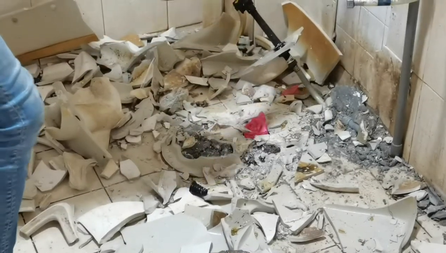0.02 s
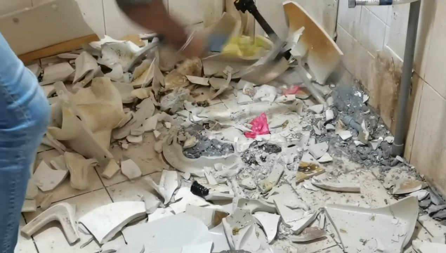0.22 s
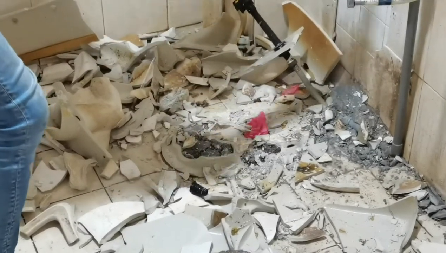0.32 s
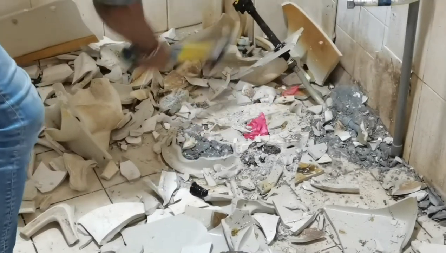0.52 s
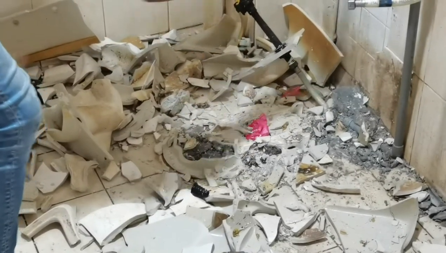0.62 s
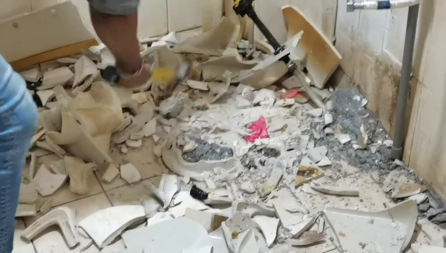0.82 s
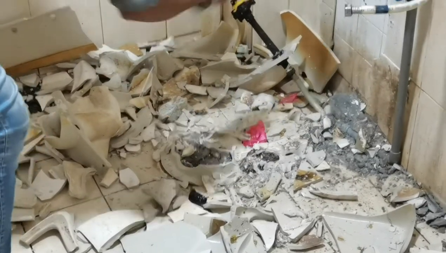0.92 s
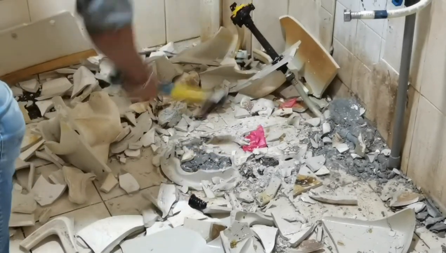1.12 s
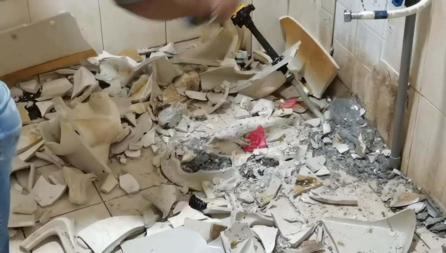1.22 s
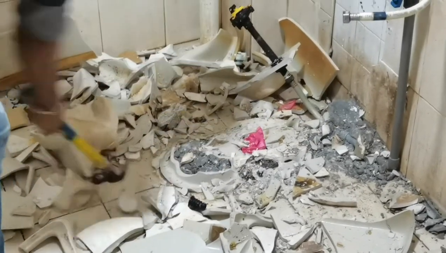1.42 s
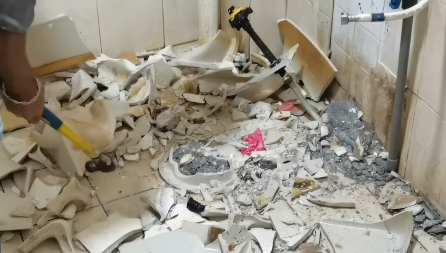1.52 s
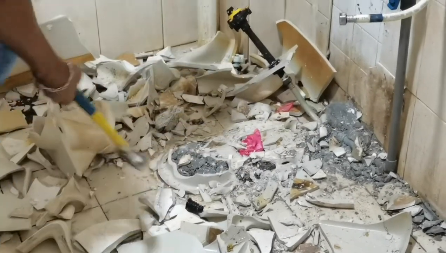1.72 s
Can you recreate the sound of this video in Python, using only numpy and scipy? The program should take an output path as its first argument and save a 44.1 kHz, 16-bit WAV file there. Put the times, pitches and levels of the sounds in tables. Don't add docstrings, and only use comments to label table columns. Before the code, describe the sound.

Hammer blows smash ceramic in a small tiled bathroom, the tail of an earlier blow still ringing at the start. Sharp cracks with brief steel ring and floor thud fall at 0.2 (hardest), 0.5, 0.8 and 1.13 seconds, then a weak tap at 1.44 with a crunchy scatter. Bright shards crumble and clink between, thinning after 1.6 into short reverberation, faint hum and soft handling bumps.

```python
import sys
import numpy as np
from scipy import signal
from scipy.fft import rfft, irfft, next_fast_len
from scipy.io import wavfile
from scipy.ndimage import uniform_filter1d

SR = 44100
rng = np.random.default_rng(int(sys.argv[2]) if len(sys.argv) > 2 else 0)


def makeup_ratio(level_db):
    decades = np.asarray(level_db, float) / 20
    return 10 ** decades


def file_out(sig):
    cols = np.atleast_2d(sig).T
    lim = np.clip(cols, -1, 1)
    pcm = np.round(lim * 32767).astype(np.int16)
    wavfile.write(sys.argv[1], SR, pcm)


N = 79380
PRE = SR // 5
TOP_HZ = 15300

# t/s, crack level/dB, low head ring level/dB, high head ring level/dB, thud level/dB
BLOW_TABLE = [
    (.2003, -3.5, -10, -12, -16),
    (.498, -8.5, -9, -17, -20),
    (.807, -11.5, -13, -19.5, -22),
    (1.1302, -7.5, -13, -15, -20),
    (1.439, -17, -26, -28, -30),
]


def shape(x, curve):
    n = next_fast_len(x.shape[-1] + 4096)
    hz, db = np.array(curve, float).T
    f = np.maximum(np.arange(n // 2 + 1) * SR / n, 1)
    gain = makeup_ratio(np.interp(np.log(f), np.log(hz), db))
    return irfft(rfft(x, n) * gain, n)[..., :x.shape[-1]]


def unit(x):
    return x / np.abs(x).max()


def ring(modes, rise_s):
    t = np.arange(SR // 3) / SR
    hz, db, t60 = np.array(modes, float).T[:, :, None]
    tones = makeup_ratio(db) * np.sin(2 * np.pi * np.minimum(hz, .45 * SR) * t)
    fade = 1000 ** (-t / t60)
    return (tones * fade).sum(0) * (1 - np.exp(-t / rise_s))


def add(track, sound, s):
    i = int(round(s * SR)) + PRE
    track[i:i + len(sound)] += sound[:max(len(track) - i, 0)]


def air():
    # f/Hz, level/dB
    colour = [(18, -27), (30, -3), (105, 3.5), (485, -19), (7830, -61), (9150, -49.5), (10400, -21),
              (15000, -54.5)]
    x = shape(rng.standard_normal((2, N)), colour)
    steps = np.repeat(rng.standard_normal(N // 2000 + 1), 2000)
    swell = uniform_filter1d(steps, 2000)[:N]
    return makeup_ratio(-60 + 2.4 * swell) * x / x.std()


def hand_bumps():
    # t/s, level/dB, f/Hz, t60/s
    knocks = [
        (.196, -27, 55, .04),
        (0.493, -30, 40, .05),
        (0.947, -35.5, 50.5, 0.038),
        (.99, -30.5, 221, 0.037),
        (.87, -44, 110, .12),
        (1.389, -41, 99.6, 0.083),
        (1.615, -42, 98, 0.16),
        (1.74, -45.5, 94.7, 0.25),
    ]
    bumps = np.zeros(N + PRE)
    for s, db, hz, t60 in knocks:
        add(bumps, makeup_ratio(db) * ring([(hz, 0, t60)], rise_s=0.0038), s)
    return bumps


def room():
    # f/Hz, t60/s
    decay = [(100, 0.37), (260, 0.36), (700, 0.41), (1840, 0.36), (4850, .29), (12800, 0.21)]
    wall_s, likeness = .005, 0.023
    t = np.arange(SR // 2) / SR
    mid, side = rng.standard_normal((2, len(t)))
    mid = mid * np.sqrt(1 + likeness)
    side = side * np.sqrt(1 - likeness)
    spec = rfft(np.array([mid + side, mid - side]))
    at = np.log(np.maximum(np.arange(spec.shape[1]) * SR / len(t), 1))
    hz, t60 = np.array(decay).T
    tail = np.zeros((2, len(t)))
    for k in range(len(hz)):
        band = np.interp(at, np.log(hz), np.eye(len(hz))[k])
        tail += irfft(spec * band, len(t)) * makeup_ratio(-60 * t / t60[k])
    tail = tail * (1 - np.exp(-(t / wall_s) ** 2))
    return tail / np.sqrt((tail ** 2).sum(1, keepdims=True))


def grit(waits, length, hz, octaves):
    t60_s, scatter_db, straggle = 0.0072, 3, 1.98
    a, b, c = rng.random((len(waits), 3)).T[:, :, None]
    chip = np.arange(1024)
    t = chip / SR
    pitch = np.maximum(hz * 2 ** (octaves * 2.5 * (a + b - 1)), 400)
    size = makeup_ratio(-scatter_db * np.log(c + 0.026)) * (pitch < TOP_HZ)
    size = size * np.exp(-waits[:, None] / straggle)
    fade = 1000 ** (-t / (t60_s * (.4 + 3 * a * c)))
    chips = size * np.cos(2 * np.pi * pitch * t) * fade
    start = (waits * length * SR).astype(int)[:, None]
    return np.bincount((start + chip).ravel(), chips.ravel())


def crumbling_heaps():
    # t/s, level/dB, centre f/Hz, width/octaves, length/s
    bursts = [(-.1, -17, 5980, 0.85, .045), (0.2, -25, 7700, .7, 0.03), (.497, -13, 5410, 0.93, 0.027),
              (0.807, -8.5, 7060, .7, 0.039), (1.129, -24, 9000, .5, .01), (1.434, -19, 7600, 0.62, 0.0089),
              (0.346, -33.5, 10400, .3, 0.011), (.41, -31, 2980, 0.77, 0.00094),
              (0.471, -48, 9900, 0.35, 0.0077), (0.526, -19, 1480, .6, .015),
              (0.561, -15.5, 10600, 0.36, .01), (.646, -20.5, 6520, 0.76, .015),
              (0.916, -21.5, 7620, 0.66, 0.0043), (0.957, -25.5, 10380, 0.24, 0.023),
              (1.028, -36, 9500, 0.39, .015), (1.08, -50, 10960, .3, 0.0066),
              (1.1045, -17, 10640, 0.14, 0.011), (1.245, -36.5, 10400, 0.407, 0.026),
              (1.463, -10, 6590, 1.09, .018), (1.534, -26.5, 4540, 0.77, 0.029),
              (1.679, -48.5, 11560, .3, 0.011)]
    heaps = np.zeros(N + PRE)
    for s, db, hz, octaves, length in bursts:
        waits = rng.exponential(size=240) + .3 * rng.exponential(size=240)
        add(heaps, makeup_ratio(db - 14) * grit(waits, length, hz, octaves), s)
    return signal.sosfilt(signal.butter(2, 450, "high", fs=SR, output="sos"), heaps)


def shard_clinks():
    # t/s, level/dB, low mode f/Hz, high mode f/Hz, high mode level/dB
    bounces = [(.102, -55, 8000, 12300, 10.5), (.131, -50.5, 8100, 10300, -5), (.182, -55, 7800, 10400, 4),
               (.26, -26, 8700, 11000, 7), (.305, -28, 6500, 8600, 0), (.41, -36, 2230, 3800, -1),
               (.715, -36, 5200, 3600, -1), (0.473, -46, 6100, 10600, -1), (0.589, -25.5, 7030, 9700, 4.5),
               (.647, -20.5, 8500, 11700, 3.5), (.657, -26, 4770, 2500, -4.5),
               (.685, -25.5, 7000, 11000, -0.5), (.74, -27.5, 9500, 12200, 0),
               (.786, -26.5, 9400, 12200, -0.5), (.915, -29, 6680, 10300, -1.5),
               (1.235, -35, 8020, 11200, 2.5), (1.50, -28.5, 6730, 9100, -8), (1.54, -28, 6830, 3900, -1),
               (1.60, -37.5, 9010, 6800, -2.5), (1.708, -39.5, 10300, 12000, -3),
               (1.706, -52.5, 7820, 2300, -4), (1.75, -52, 10300, 12000, -2.5),
               (1.79, -51.5, 7970, 11800, 0)]
    t60_s, trim_db, tick_db, split = .036, -3, -15, 1.013
    clinks = np.zeros(N + PRE)
    for s, db, low_hz, high_hz, high_db in bounces:
        tick = np.diff(rng.standard_normal(size=90)) * np.exp(-np.arange(89) / 20)
        modes = [(low_hz, -high_db, t60_s), (high_hz, high_db, t60_s * 0.94)]
        twins = [(hz * split, gain_db - 7, t60 * .6) for hz, gain_db, t60 in modes]
        add(clinks, makeup_ratio(db + trim_db) * ring(modes + twins, rise_s=.0012), s)
        add(clinks, makeup_ratio(db + trim_db + tick_db) * tick, s)
    return clinks


def crack(lead_s):
    # f/Hz, level/dB
    crack_colour = [(100, -16), (280, -1.5), (600, -4), (1500, 2), (2200, -1.5), (3200, -6.5), (9000, -6.5),
                    (15000, -16.5)]
    rise_s, fall_s = 0.00078, 0.0046
    t = np.arange(SR // 10) / SR - lead_s
    env = np.exp(np.where(t < 0, t / rise_s, -t / fall_s))
    spec = rfft(env * rng.standard_normal(len(t)))
    even = irfft(spec / np.sqrt(uniform_filter1d(np.abs(spec) ** 2, size=9)), len(t))
    burst = shape(even, crack_colour)
    burst = burst * np.sqrt((env ** 2).sum() / (burst ** 2).sum())
    return np.minimum(env * 8, 1) * burst


def hammer_blows():
    # t/s, then the levels/dB as in BLOW_TABLE
    earlier = (-0.0577, -12, -30, -36, -19)
    # f/Hz, level/dB, t60/s
    head_low = [(4234, -2.5, 0.025), (4311, -2.5, 0.029), (4357, -4, 0.053), (3967, -10.5, 0.044)]
    head_high = [(8120, 0.5, 0.028), (5540, -6.5, 0.042), (5200, -5.5, 0.031)]
    # f/Hz, level/dB, t60/s
    slab = [(263.2, 1, 0.042), (311, -4.5, 0.041), (547, -4.5, 0.027), (679, -4.5, 0.032), (149.4, -8, .04)]
    low_ring = unit(ring(head_low, rise_s=.001))
    high_ring = unit(ring(head_high, rise_s=0.0015))
    thud = unit(ring(slab, rise_s=0.0027))
    lead_s = .006
    hit = np.zeros(N + PRE)
    for s, db, ring_db, high_db, thud_db in [earlier] + list(BLOW_TABLE):
        add(hit, makeup_ratio(db - 6) * crack(lead_s), s - lead_s)
        add(hit, makeup_ratio(ring_db) * low_ring + makeup_ratio(high_db) * high_ring + makeup_ratio(thud_db) * thud, s)
    return hit


def scene():
    hit, heaps, clinks = hammer_blows(), crumbling_heaps(), shard_clinks()
    direct = hit + heaps + clinks
    sample = np.arange(N + PRE)
    late = np.interp(sample - 0.00029 * SR, sample, direct)
    sent = makeup_ratio(-.7) * hit + makeup_ratio(-2) * heaps + makeup_ratio(-2.5) * clinks
    place = np.searchsorted(np.array(BLOW_TABLE)[:, 0], (sample - PRE) / SR + .01)
    wet = np.zeros((2, N + PRE))
    for k in range(len(BLOW_TABLE) + 1):
        here = (sent * (place == k))[None]
        wet += signal.fftconvolve(here, room(), axes=1)[:, :N + PRE]
    return (np.array([direct, late]) + wet + hand_bumps())[:, PRE:] + air()


def roll_off(x):
    return signal.sosfilt(signal.butter(12, 16460, fs=SR, output="sos"), x)


def record(dry):
    # f/Hz, level/dB
    ports = [(60, 14), (1200, -1), (2800, 2), (4300, 11.5), (6500, 6), (8800, 20.5), (11500, 8.5),
             (15000, 20)]
    right = shape(dry[1], [(hz, -db) for hz, db in ports])
    ceiling, mic_db = 1.3, 3
    x = ceiling * np.tanh(makeup_ratio(mic_db) * np.array([dry[0], right]) / ceiling)
    x = signal.sosfilt(signal.ellip(8, .3, 32, TOP_HZ, fs=SR, output="sos"), x)
    return roll_off(x)


dry = scene()
out = record(dry)
file_out(out)
```